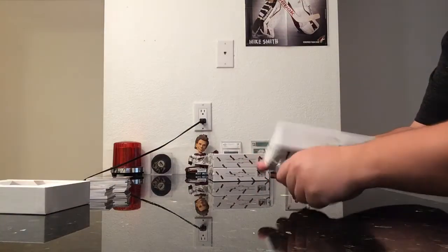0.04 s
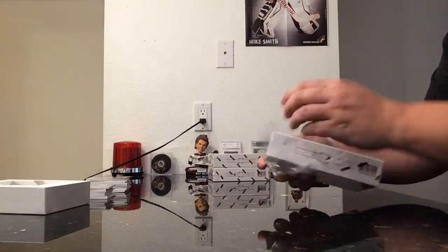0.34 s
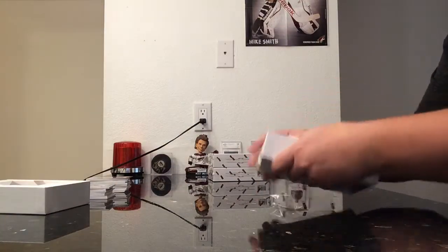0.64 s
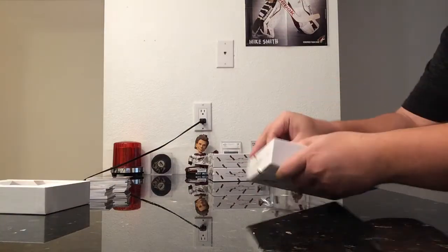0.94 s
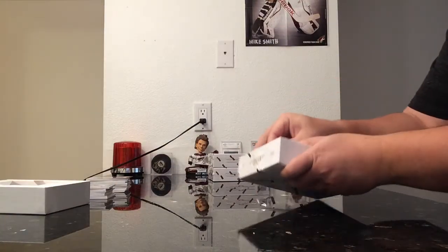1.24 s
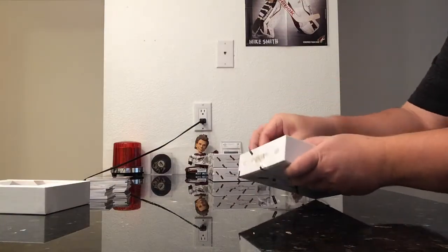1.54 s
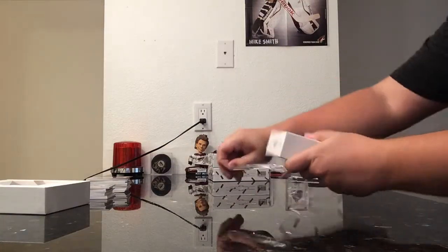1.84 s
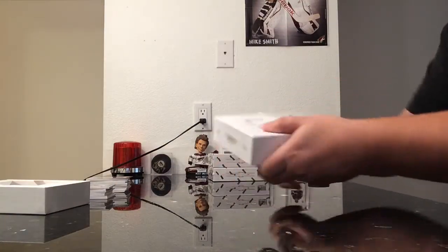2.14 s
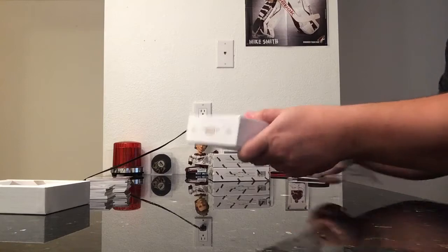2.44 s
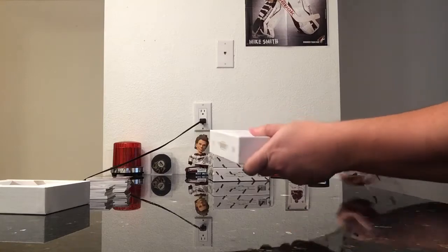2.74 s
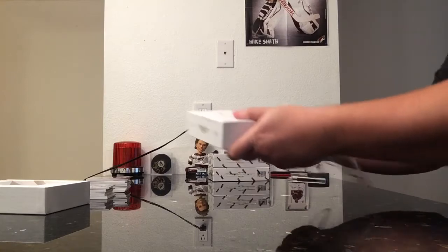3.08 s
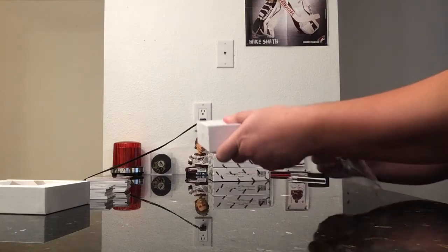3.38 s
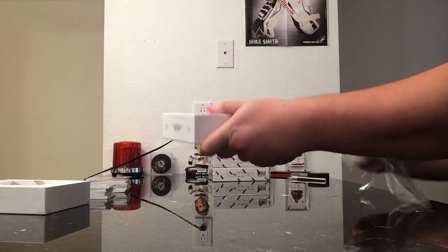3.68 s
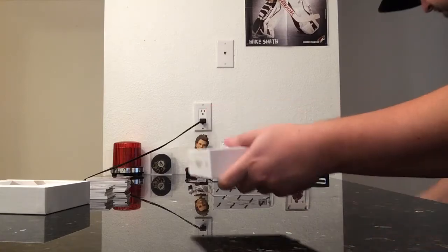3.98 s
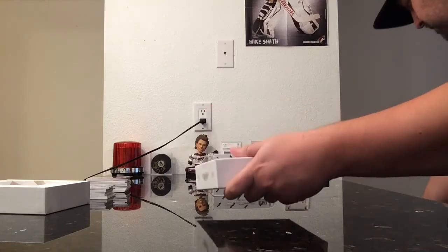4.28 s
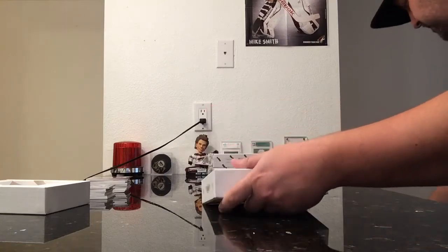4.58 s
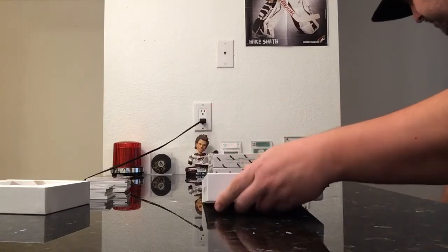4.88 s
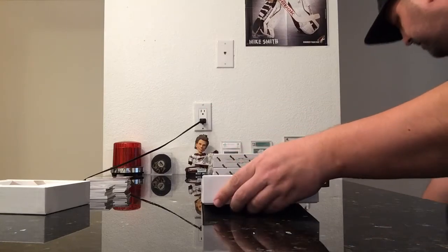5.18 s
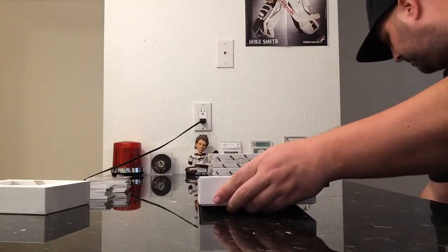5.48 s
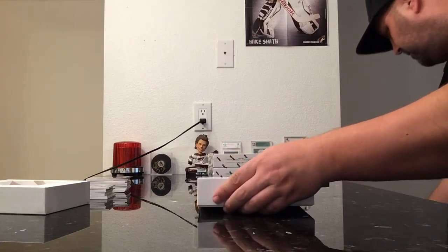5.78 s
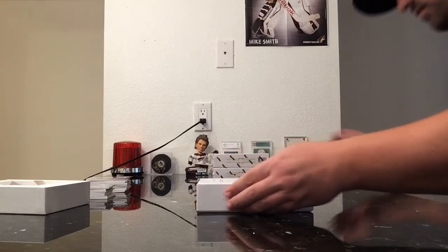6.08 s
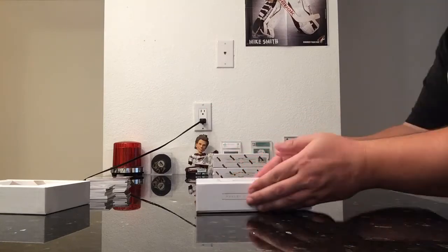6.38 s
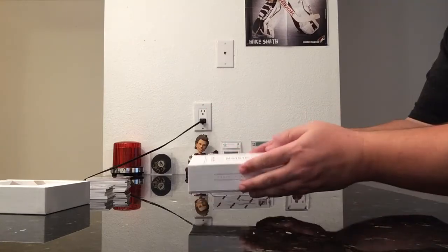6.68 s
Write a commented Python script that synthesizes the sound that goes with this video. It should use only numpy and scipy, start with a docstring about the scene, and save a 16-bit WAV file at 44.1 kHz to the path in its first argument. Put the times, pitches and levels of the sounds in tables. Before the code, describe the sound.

In a small, slightly echoing room, a nearby microphone picks up fingers tapping and rubbing a little cardboard box while plastic wrap rustles, pops and cracks loose. After the loudest crackle the wrap fades away, and the box lands on a hard tabletop. It scuffs and rasps briefly across the surface, then bumps softly as it is handled again. A faint low hum continues underneath.

```python
"""A small stiff cardboard box is turned in the hands, stripped of its plastic wrap, set down and slid.
Impacts of fingers and table excite the damped modes of its panels; stick-slip friction makes the card
rub, rasp and judder. The wrap buckles in snaps, pops and fine crinkles, and pings when released.
A small bare room adds echoes, reverberation and standing waves, and a distant appliance hums."""
import sys
import numpy as np
from scipy import signal
from scipy.fft import rfft, irfft
from scipy.io import wavfile
from scipy.ndimage import uniform_filter1d, map_coordinates

SR = 44100
rng = np.random.default_rng(int(sys.argv[2]) if len(sys.argv) > 2 else 0)


def generate_wav(signal):
    """Clip the signal to [-1, 1] and save it as 16-bit WAV at the path in sys.argv[1]."""
    frames = np.transpose(np.atleast_2d(signal))
    scaled = np.clip(frames, -1, 1) * 32767
    pcm = np.round(scaled).astype(np.int16)
    wavfile.write(sys.argv[1], SR, pcm)


N = 305172
TIME = np.arange(N) / SR
SNAP_CUTOFF_HZ = 10600

# modes of the box: (frequency [Hz], level [dB], t60 [s])
BOX_MODES = [(137.7, -4.5, 0.2), (201, -5, 0.15), (266.5, 0, 0.12), (351.4, -1.5, 0.087), (433, -8, 0.21),
             (499.5, -16.5, 0.068), (586, -7.5, 0.061), (680, -2.5, 0.033), (1032, -3, 0.058),
             (1201, -9.5, 0.15), (1460, 4, 0.0085), (1940, 3.5, 0.017), (2490, 11, 0.017)]


def from_db(db):
    """Amplitude ratio of a level in decibels."""
    return 10 ** (np.asarray(db) / 20)


def rms_one(x):
    """Normalisation to unit rms."""
    return x / np.sqrt(np.mean(x ** 2) + 1e-20)


def at_hz(points, hz):
    """Interpolation of a table on a log-frequency axis."""
    f, value = np.transpose(points)
    return np.interp(np.log(np.maximum(hz, 1)), np.log(f), value)


def cut(x, hz, kind, order=2):
    """Butterworth filter."""
    sections = signal.butter(order, np.clip(hz, 10, SR * 9 / 20), kind, fs=SR, output="sos")
    return signal.sosfilt(sections, x + 1e-18)


def colour(x, spectrum, size=8192):
    """Minimum-phase filter with the given spectrum, by folding the cepstrum."""
    cepstrum = irfft(np.log(from_db(at_hz(spectrum, np.fft.rfftfreq(size, 1 / SR)))))
    cepstrum[1:size // 2] *= 2
    cepstrum[size // 2 + 1:] = 0
    return signal.fftconvolve(x, irfft(np.exp(rfft(cepstrum))))[:len(x)]


def resonate(x, hz, width_hz):
    """Second-order resonator with unit peak gain."""
    return signal.lfilter(*signal.iirpeak(hz, hz / width_hz, fs=SR), x)


def lag(x, seconds):
    """First-order relaxation with the given time constant."""
    r = np.exp(-1 / (seconds * SR))
    return signal.lfilter([1 - r], [1, -r], x)


def ramp(s, seconds):
    """Linear rise from 0 to 1, starting at time s."""
    return np.clip((TIME - s) / seconds, 0, 1)


def add(out, s, level_db, sound):
    """Superposition of a sound at time s, its loudest 6 ms at the given rms level."""
    loudest = np.sqrt(uniform_filter1d(sound ** 2, int(.006 * SR)).max())
    part = out[round(s * SR):][:len(sound)]
    part += from_db(level_db) / loudest * sound[:len(part)]


def grains(per_s, spread_db, size=N):
    """Shot noise: a Poisson train of tiny slips of uneven strength, at unit rms."""
    strength = from_db(spread_db * np.minimum(rng.exponential(1, size), 4))
    return rms_one(strength * rng.choice([-1, 1], size) * (rng.random(size) < per_s / SR))


def flutter(rate_hz, depth_db):
    """Random amplitude modulation by a grip that catches and lets go."""
    return from_db(depth_db * rms_one(cut(rng.standard_normal(N), rate_hz, "low")))


def on_table():
    """Crossfade from 0 while the box is held to 1 once it rests on the table."""
    return ramp(4.6, 0.1)


def background(air_db=-69):
    """Steady appliance tones add to a broadband rumble of air."""
    # partials of the hum: (frequency [Hz], rms level [dB])
    partials = [(59.6, -72.5), (119.8, -66)]
    # spectrum of the air: (frequency [Hz], relative density [dB])
    air_spectrum = [(18, -36), (55, -8), (76, -9), (100, -4.5), (170, -3.5), (460, -16.5), (837, -20.5),
                    (2630, -26.5), (15000, -35)]
    hum = sum(from_db(db) * np.sqrt(2) * np.sin(2 * np.pi * (hz * TIME + rng.random()))
              for hz, db in partials)
    return hum + from_db(air_db) * rms_one(colour(rng.standard_normal(N), air_spectrum))


def swell(s, length, skew=0.59, roundness=0.51):
    """Velocity envelope of a hand stroke: an early, broad peak, then an easing off."""
    progress = np.clip((TIME - s) / length, 0, 1)
    return np.abs(np.sin(np.pi * progress ** skew)) ** roundness


def friction():
    """Incoherent sources add in power: touch, strokes, skids and slide set rustle, rub and drag gains."""
    # shifts of grip: (start [s], length [s], rustle level [dB], panel drag above rustle [dB])
    strokes = [(0.0, 0.15, -51.5, -3.5), (0.167, 0.058, -47.5, 0.5), (0.236, 0.15, -55.5, 1.5),
               (0.439, 0.26, -54, 6.5), (0.736, 0.098, -62.5, 8.5), (0.872, 0.3, -67, 13),
               (1.196, 0.3, -70.5, 12.5), (1.534, 0.27, -74.5, 18), (1.623, 0.11, -51.5, -1.5),
               (1.755, 0.62, -62, 4), (1.925, 0.39, -63.5, 9.5), (2.103, 0.11, -45.5, 1.5),
               (2.222, 0.12, -51, 0.5), (2.336, .17, -54, -2), (2.66, 0.18, -65.5, 5),
               (2.805, 0.1, -61.5, -5), (3.017, 0.24, -55, -4.5), (3.305, 0.16, -62, -2),
               (3.446, 0.25, -52.5, 0.5), (3.703, 0.29, -63.5, 0.5), (4.193, 0.094, -66, -26),
               (6.503, 0.16, -77, 9.5)]
    # a fingertip skids over bare card: (start [s], length [s], level [dB])
    skids = [(0.008, 0.067, -48), (0.296, 0.037, -52.5), (3.075, 0.041, -48), (3.484, 0.016, -42.5),
             (5.424, 0.091, -50.5), (6.619, 0.017, -65.5)]
    loose_wrap = ramp(1.474, 0.062) * (1 - ramp(4.015, 0.45))   # crinkles in the hand until put away
    rustle_power = (from_db(-66.5) * loose_wrap) ** 2
    drag_power = from_db(-76) ** 2 + from_db(-3) ** 2 * rustle_power
    for s, length, level_db, pressure_db in strokes:
        stroke_power = (from_db(level_db) * swell(s, length)) ** 2
        rustle_power += stroke_power
        drag_power += from_db(pressure_db) ** 2 * stroke_power
    skid_power = sum((from_db(level_db) * swell(s, length)) ** 2 for s, length, level_db in skids)
    rub_power = from_db(-11) ** 2 * rustle_power + from_db(-10) ** 2 * drag_power + skid_power
    return np.sqrt(np.array([rustle_power, rub_power, drag_power]) + np.array(slide()) ** 2)


def bright_ring(x):
    """A narrow resonance near 2.8 kHz colours the crinkles and snaps."""
    return x + 0.8 * resonate(x, hz=2830, width_hz=200)


def handling(rustle_gain, rub_gain):
    """Tiny buckles and slips make shot noise: wrap crinkles, card scuffs the table and skin rubs."""
    # spectra of wrap, card on table and card on skin: (frequency [Hz], relative density [dB])
    crinkle_spectrum = [(600, -19), (2200, -3.5), (3500, -2), (4800, -3), (8000, -5), (12000, -6.5),
                        (15500, -7)]
    scuff_spectrum = [(600, -32), (2000, 3), (2800, 2), (4000, 2.5), (8000, -1.5), (12000, -5.5),
                      (15500, -7)]
    rub_spectrum = [(300, -5.5), (700, -4), (1150, 3), (1500, -0.5), (2200, -1), (2780, -0.5), (3400, -18),
                    (6000, -19.5), (15000, -16)]
    grip = flutter(rate_hz=41, depth_db=1.5) ** (1 - on_table())
    crackles = from_db(-3) * grains(per_s=110, spread_db=2.8)
    creases = grains(per_s=3600, spread_db=-3.5) + crackles
    crinkle = from_db(-3.5) * rms_one(bright_ring(colour(creases, crinkle_spectrum)))
    scuff = from_db(-2.5) * rms_one(colour(grains(per_s=4000, spread_db=3.5), scuff_spectrum))
    slowed = ramp(5.48, 0.1)
    for _ in range(2):   # two low-pass stages dull the scuff as the box slows
        scuff = (1 - slowed) * scuff + slowed * cut(scuff, 10800, "low")
    rub = from_db(-2) * rms_one(colour(grains(per_s=5000, spread_db=3.5), rub_spectrum))
    rustle = (1 - on_table()) * crinkle + on_table() * scuff
    return grip * (rustle_gain * rustle + rub_gain * rub)


def box_ring(place_db, damping, pitch=1, size=SR // 2):
    """Impulse response of the box: a brief local flex, then damped modes weighted by place of touch."""
    t = np.arange(size) / SR
    hz, level_db, t60 = np.array(BOX_MODES).T[:, :, None]
    envelopes = from_db(level_db + place_db - 60 * damping * t / t60)
    modes = envelopes * np.cos(2 * np.pi * pitch * hz * t)
    flex = 3.1 * np.exp(-t / 0.00028)
    return modes.sum(axis=0) + flex


def drag(gain):
    """Stick-slip forces the panels into vibration, deeper once the box rests on the table."""
    slips = grains(per_s=820, spread_db=-1) * flutter(rate_hz=43, depth_db=3.5)
    panels = cut(signal.fftconvolve(slips, box_ring(0, damping=0.96))[:N], 753, "low", order=3)
    held = from_db(-7.5) * rms_one(cut(panels, 320, "high", order=4))
    resting = rms_one(cut(cut(panels, 150, "high", order=4), 1450, "low"))
    jolts = from_db(-17) * rms_one(cut(slips, [45, 130], "band"))   # the held box moves as a whole
    return gain * ((1 - on_table()) * (held + jolts) + on_table() * resting)


def pings(rise_s=0.00065, decay_s=0.0016, jitter=0.1, size=SR // 20):
    """Damped free vibration: released wrap rings for milliseconds at an unsteady pitch."""
    # taut wrap slips off a fingertip: (time [s], level [dB], pitch [Hz])
    releases = [(0.018, -49, 2920), (0.039, -47, 2450), (0.049, -45, 2620), (0.060, -45, 2600),
                (0.068, -44, 2700), (1.615, -50, 2530), (3.3302, -44.5, 2700)]
    out, t = np.zeros(N), np.arange(size) / SR
    envelope = (1 - np.exp(-t / rise_s)) * np.exp(-t / decay_s)
    for s, level_db, hz in releases:
        waver = 1 + jitter * rms_one(cut(rng.standard_normal(size), 1100, "low"))
        add(out, s, level_db, envelope * np.sin(2 * np.pi * np.cumsum(hz * waver) / SR))
    return out


def contact(hardness_hz, bass_hz, pitch):
    """An impact has limited bandwidth: a soft one drives the low modes, a small one omits the bass."""
    place_db = rng.normal(0, 1.5, (len(BOX_MODES), 1))
    damping = 1.55 / pitch ** 3.5   # a palm that lowers a panel's pitch also damps it
    ring = cut(box_ring(place_db, damping, pitch, size=SR // 4), bass_hz, "high")
    return cut(ring, hardness_hz, "low", order=8) + from_db(-45) * ring


def crease(decay_s, bright_hz, rise_s=.0013, size=SR // 4):
    """Buckling releases stored elastic energy as a crack and a dying spray of smaller ones."""
    # spectrum of a crease: (frequency [Hz], relative density [dB])
    crease_spectrum = [(150, -17), (400, -9.5), (1200, -2), (1900, -0.5), (2800, 3.5), (3400, -1),
                       (3850, 6), (4800, -4), (6300, 2), (8000, -5), (12000, 0.5), (15500, 3.5)]
    t = np.arange(size) / SR
    envelope = np.exp(-t / decay_s) * (1 - np.exp(-t / rise_s))
    spray = grains(per_s=3000, spread_db=3.5, size=size) * envelope
    spray[0] = 7   # the opening crack
    return cut(colour(spray, crease_spectrum), bright_hz, "low")


def knocks(settle_s=.011):
    """Impact excitation: each blow rings the box, ticks its edge and settles in a softer contact."""
    # blows on the box: (time [s], level [dB], hardness cut-off [Hz], bass cut [Hz], pitch [ratio])
    blows = [(0.068, -43.5, 1380, 900, 0.88), (0.476, -44, 800, 105, 1.17), (0.523, -32.5, 623, 80.5, 0.86),
             (0.593, -50.5, 606, 150, 1.35), (0.727, -22.5, 995, 242, 1.0), (1.079, -48.5, 645, 347, 1.03),
             (1.281, -45.5, 1110, 219, 1.19), (1.381, -50, 660, 350, 1.03), (1.947, -42.5, 3000, 576, 0.8),
             (2.233, -41.5, 1070, 180, 1.02), (2.757, -52.5, 1510, 351, 1.04),
             (3.087, -50.5, 577, 396, 1.1), (3.4986, -28, 1440, 605, 1.05), (3.510, -37.5, 845, 141, 0.91),
             (3.599, -45.5, 716, 350, 1), (4.544, -54.5, 1410, 306, 1), (4.582, -27, 2100, 270, 1.066),
             (4.5826, -42, 2150, 606, 1.02), (4.706, -48.5, 613, 280, 1), (5.377, -40, 810, 170, 0.65),
             (5.951, -57.5, 960, 298, 0.53), (6.07, -34, 1030, 230, 0.927), (6.370, -44.5, 1920, 480, 1.04),
             (6.38, -43.5, 336, 247, 1.046), (6.814, -60.5, 2000, 250, 1.37)]
    out = np.zeros(N)
    for s, level_db, hardness_hz, bass_hz, pitch in blows:
        add(out, s, level_db, contact(hardness_hz, bass_hz, pitch))
        edge_tick = crease(decay_s=0.019, bright_hz=1.8 * hardness_hz)
        add(out, s, -40 + 0.5 * level_db, edge_tick)   # grows more slowly than the blow
        add(out, s + settle_s, level_db - 11.5, contact(0.79 * hardness_hz, bass_hz, pitch))
    return out


def pops(decay_s=0.0066, low_hz=6550):
    """Single creases buckle in short, bright transients that stand out of the crinkle."""
    # pops of the wrap: (time [s], level [dB])
    buckles = [(0.131, -59), (0.150, -54), (0.576, -65), (0.608, -56), (0.646, -60), (1.058, -62.5),
               (1.867, -55.5), (3.331, -55.5), (3.726, -64), (3.809, -55.5), (2.842, -58), (4.05, -62)]
    out = np.zeros(N)
    for s, level_db in buckles:
        add(out, s, level_db, cut(crease(decay_s, SNAP_CUTOFF_HZ), low_hz, "high"))
    return out


def snaps():
    """Snap-through buckling of wrap and card edges gives sharp cracks, heard with a narrow ring."""
    # snaps, each with a spray of creases: (time [s], level [dB], spray decay [s])
    buckles = [(0.184, -42, 0.021), (0.2, -43, 0.0009), (0.263, -47.5, 0.0033), (0.316, -51.5, .005),
               (0.456, -52.5, 0.025), (0.531, -47.5, 0.006), (0.986, -58, 0.0071), (1.653, -32.5, 0.0045),
               (1.659, -38, 0.042), (1.675, -41, .001), (1.715, -45, 0.023), (1.73, -49, .001),
               (1.758, -44, .001), (1.943, -53.5, 0.025), (2.233, -45, 0.02), (2.263, -54, 0.00089),
               (2.412, -48, 0.013), (3.4994, -31, 0.0054), (3.505, -32, 0.014), (3.511, -31, .001),
               (3.523, -44.5, 0.043), (3.724, -50, 0.046), (3.727, -50, 0.00092), (4.5825, -57, .001),
               (6.369, -65, 0.022)]
    out = np.zeros(N)
    for s, level_db, decay_s in buckles:
        add(out, s, level_db, crease(decay_s, SNAP_CUTOFF_HZ))
    return bright_ring(out)


def thuds(swell_s=0.003):
    """A cushioned mass is heavily damped: its motion swells and dies within a few cycles."""
    # the whole box meets a palm or the table: (time [s], level [dB], pitch [Hz])
    landings = [(0.52, -46, 83.3), (0.728, -51, 78.4), (1.598, -47.5, 162), (5.545, -31.5, 214),
                (6.068, -38, 141), (6.365, -48, 90)]
    out, t = np.zeros(N), np.arange(SR // 8) / SR
    envelope = (t / swell_s) ** 2 * np.exp(-t / swell_s)
    for s, level_db, hz in landings:
        add(out, s, level_db, envelope * np.sin(2 * np.pi * hz * t))
    return out


def rasps(q=4.5):
    """Fine slips drive one resonance of the card, giving a hollow rasp or a thin squeak."""
    # card chatters on table or finger: (start [s], length [s], level [dB], pitch [Hz])
    chatters = [(3.082, 0.046, -53.5, 430), (4.885, .26, -73, 2810), (5.376, 0.055, -44.5, 640),
                (5.378, 0.091, -44.5, 200), (5.561, 0.022, -47.5, 350), (5.604, 0.044, -49, 564)]
    out = np.zeros(N)
    for s, length, level_db, hz in chatters:
        size = int(length * SR)
        slips = grains(per_s=4500, spread_db=2, size=size) * signal.windows.tukey(size, 1 / 4)
        ring = resonate(np.pad(slips, (0, SR // 20)), hz, hz / q)
        add(out, s, level_db, cut(ring, [hz / 2, hz * np.sqrt(2)], "band"))
    return out


def slide(bear_down_s=5.36):
    """Sliding friction grows with speed: gains of scuff, rub and panel drag along the table."""
    # speed of the box, expressed as a level: (time [s], level [dB])
    speed_curve = [(4.619, -66.5), (4.87, -75.5), (4.93, -65.5), (4.981, -71.5), (5.11, -68.5),
                   (5.199, -74.5), (5.285, -65.5), (5.325, -60), (5.375, -57.5), (5.412, -44.5),
                   (5.489, -62.5), (5.54, -56.5), (5.701, -71.5), (6.04, -84.5)]
    s, db = np.transpose(speed_curve)
    speed = from_db(np.interp(TIME, s, db)) * ramp(s[0], 0.06) * (1 - ramp(s[-1], 0.032))
    pressure = from_db(-53.5 + 8 * ramp(bear_down_s, 0.0099))
    return from_db(3) * speed, from_db(-2.5) * speed, pressure * (speed / speed.max()) ** 0.67


def judders(bass_hz=175, slip_s=0.00047):
    """Stick-slip with a gradual release drives mainly the low modes of the pressed panels."""
    # runs of slips on the table: (start [s], length [s], level [dB], sharpness cut-off [Hz])
    slip_runs = [(5.381, 0.061, -44, 950), (5.503, 0.019, -43.5, 228), (5.564, 0.043, -38.5, 338),
                 (5.797, 0.034, -47, 265)]
    out = np.zeros(N)
    for s, length, level_db, sharp_hz in slip_runs:
        size = int(length * SR)
        slips = grains(per_s=1600, spread_db=1.5, size=size) * signal.windows.tukey(size, 1 / 4)
        ring = lag(signal.fftconvolve(slips, box_ring(0, damping=1.1, pitch=0.75)), slip_s)
        add(out, s, level_db, cut(cut(ring, bass_hz, "high", order=4), sharp_hz, "low", order=4))
    return out


def near_echoes(x, sway=0.1054, sway_hz=.4):
    """Comb filtering: the sound interferes with reflections whose delays drift with the hands."""
    # reflections from table and wall: (delay [s], gain [ratio])
    reflections = [(.0024, 0.089), (.0056, 0.21), (.0112, 0.14), (.0171, 0.14)]
    out = x
    for k, (delay, gain) in enumerate(reflections):
        path_s = delay * (1 + sway * np.sin(2 * np.pi * sway_hz * TIME + 2 * k))
        out = out + gain * map_coordinates(x, [(TIME - path_s) * SR], order=3)
    return out


def room(x, early_db=-4.5, early_s=0.01, tail_db=-8.5, build_s=0.00057):
    """A diffuse field joins the sound: each band's energy returns in a burst, then decays slowly."""
    # reverberation time of the room: (frequency [Hz], t60 [s])
    decay_times = [(100, 0.37), (400, 0.4), (1500, 0.71), (4000, 0.82), (8000, 0.47), (15000, 0.1)]
    edges = np.geomspace(70, 17000, 15)
    out = x
    for low, high in zip(edges, edges[1:]):
        energy = lag(cut(x, [low, high], "band", order=3) ** 2, build_s)
        t60 = at_hz(decay_times, np.sqrt(low * high))
        early = from_db(early_db) ** 2 * lag(energy, early_s)
        tail = from_db(tail_db) ** 2 * lag(energy, t60 / np.log(1e6))
        noise = rms_one(cut(rng.standard_normal(N), [low, high], "band", order=3))
        out = out + np.sqrt(early + tail) * noise
    return out


def standing_waves(x, t60_s=0.43):
    """Lightly damped room modes ring on as narrow tones after knocks and scrapes."""
    # modes of the room: (frequency [Hz], gain [dB])
    room_modes = [(266, -4), (357, -5), (435, -4.5), (696, -6), (795, 3), (871, -3), (1028, 0), (1226, 9)]
    width_hz = np.log(1000) / (np.pi * t60_s)
    return sum(from_db(gain_db) * resonate(x, hz, width_hz) for hz, gain_db in room_modes)


def scene():
    """Superposition of box, wrap, room response and hum in one channel."""
    rustle_gain, rub_gain, drag_gain = friction()
    direct = handling(rustle_gain, rub_gain) + drag(drag_gain)
    direct += pings() + knocks() + pops() + snaps() + thuds() + rasps() + judders()
    return (room(near_echoes(direct)) + standing_waves(direct) + background())[None]


def record(dry, cutoff_hz=15300):
    """Band limiting: a steep elliptic low-pass removes the highest treble."""
    return signal.sosfilt(signal.ellip(12, .1, 70, cutoff_hz, fs=SR, output="sos"), dry)


dry = scene()
out = record(dry)
generate_wav(out)
```